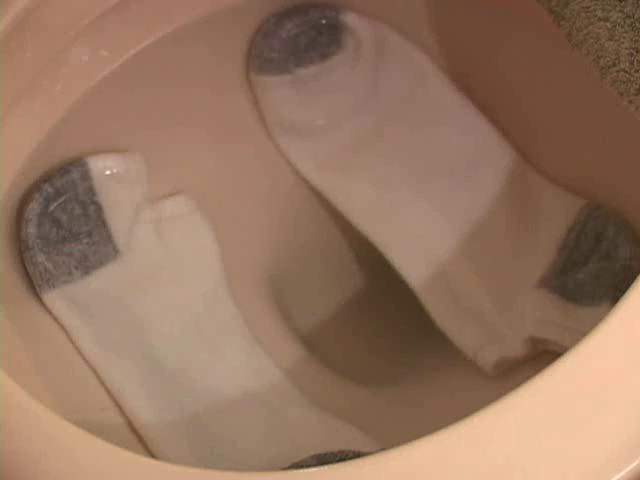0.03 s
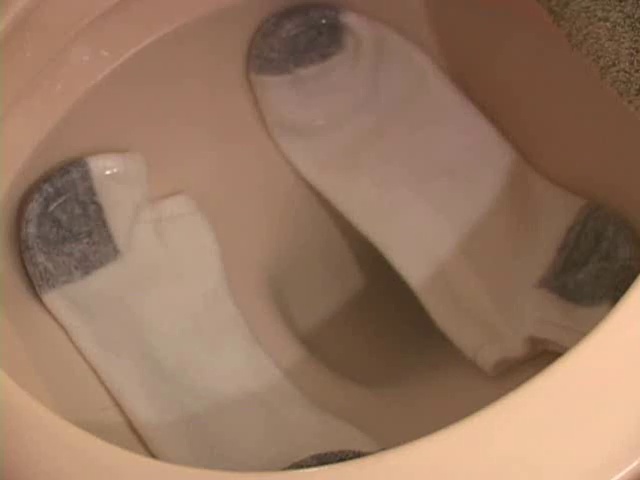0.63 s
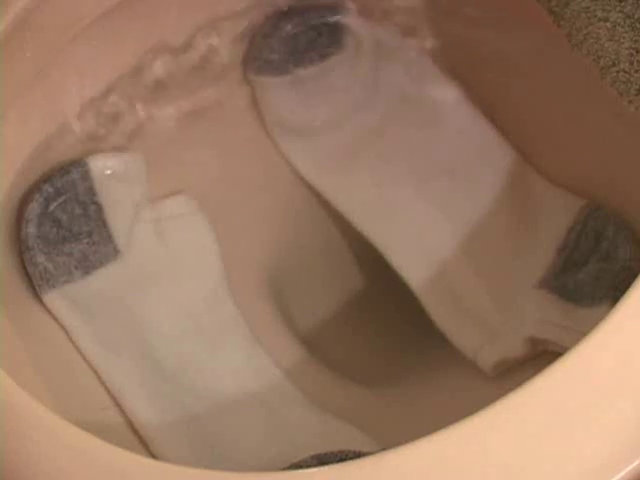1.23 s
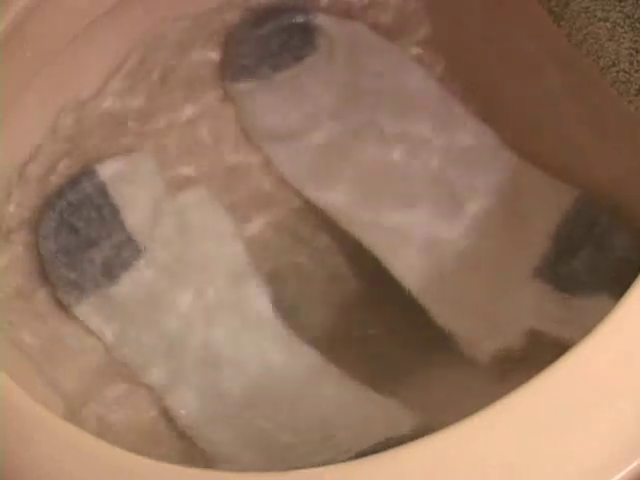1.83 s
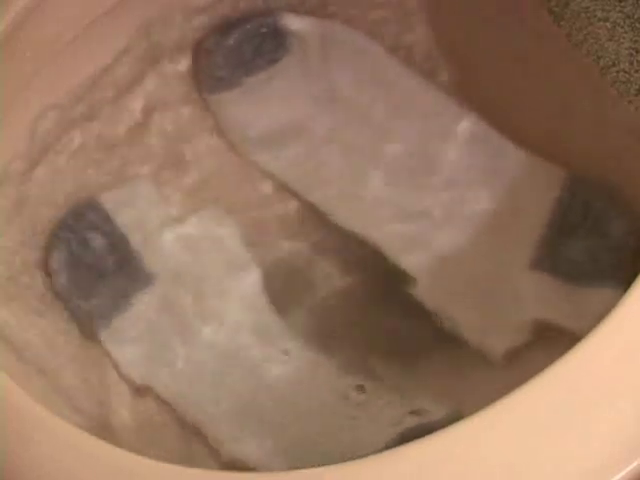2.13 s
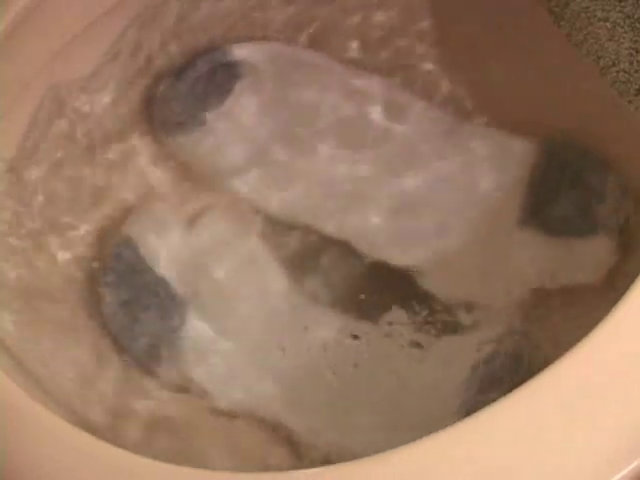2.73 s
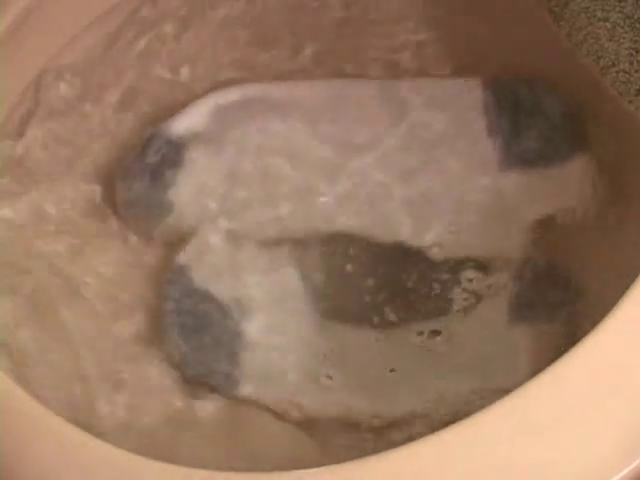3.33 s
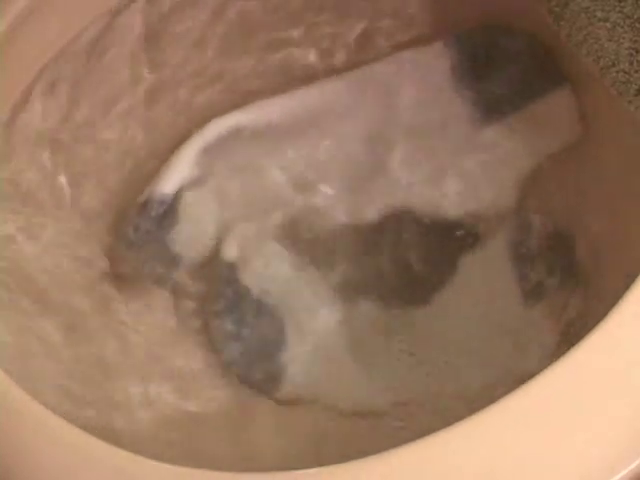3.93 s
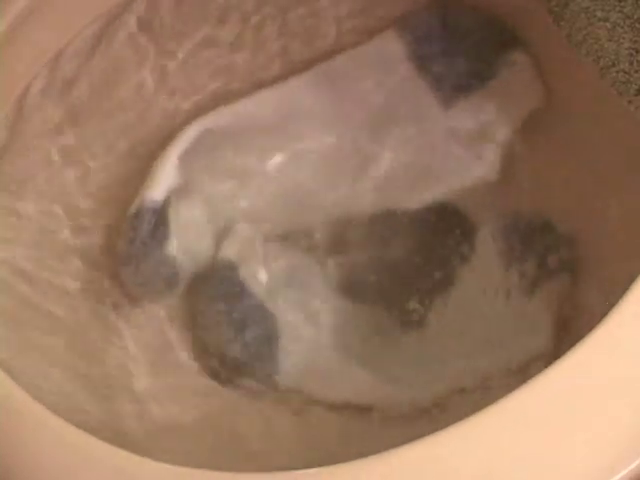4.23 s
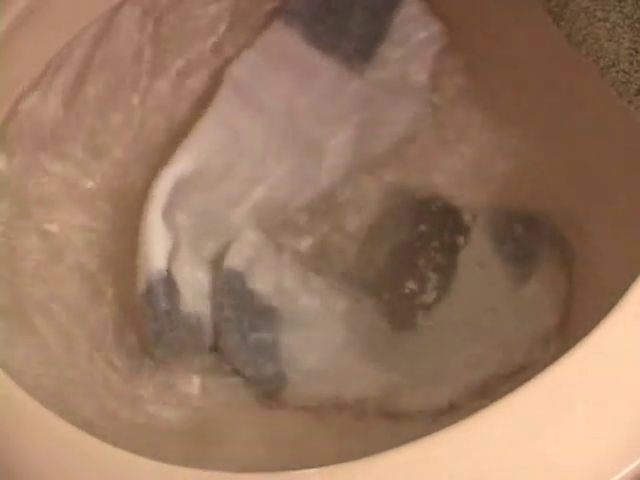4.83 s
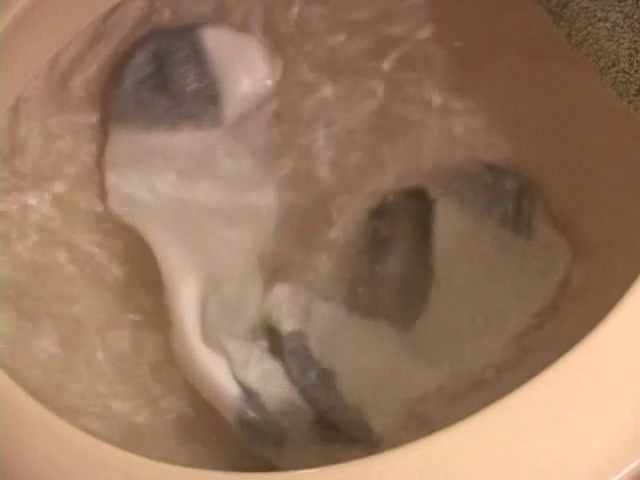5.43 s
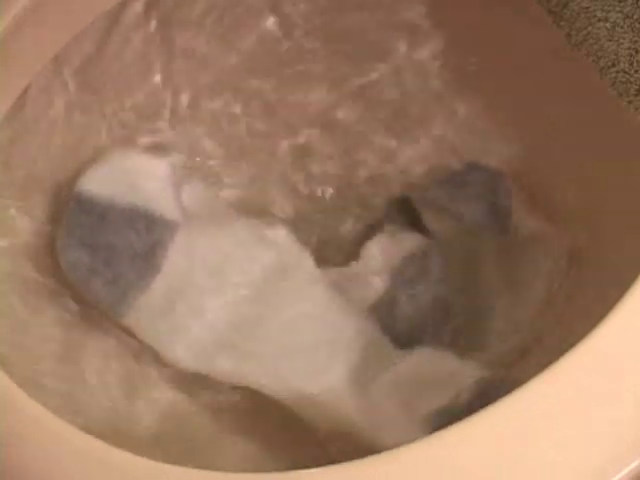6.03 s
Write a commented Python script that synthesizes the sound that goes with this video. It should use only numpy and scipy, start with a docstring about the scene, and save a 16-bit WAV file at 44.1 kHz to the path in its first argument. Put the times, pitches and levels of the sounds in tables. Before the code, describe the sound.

Close up in a small bathroom, a toilet handle knocks softly and water gushes around the bowl, gulping and gurgling down the drain.

```python
"""A small bathroom, just above the toilet bowl: a flush with a pair of socks in it.
The handle knocks on the tank. Water comes in gushes: large bubbles churn, small ones splash,
spray ticks with a low microphone rumble. The drain gulps, then gurgles over a trickle from the rim.
The water rings in the hollow of the bowl, the walls add a short tail; heard on the left channel."""
import sys
import numpy as np
from scipy import signal
from scipy.io import wavfile
from scipy.ndimage import uniform_filter1d

SR = 44100
rng = np.random.default_rng(int(sys.argv[2]) if len(sys.argv) > 2 else 0)


def unload_wav(signal):
    """Save mono or channel-first audio to the path in sys.argv[1] as 16-bit WAV at rate SR, clipped to [-1, 1]."""
    wavfile.write(
        sys.argv[1],
        SR,
        np.round(np.clip(np.atleast_2d(signal).T, -1, 1) * 32767).astype(np.int16),
    )


N = 268569
TIME_S = np.arange(N) / SR

# start_s, rise_s, fall_after_s, t60_s, churn_db, splash_db, spray_db, splash_pitch_hz
WATER_GUSHES = [(.82, .07, .13, 2.5, -58, -55, -63, 1700), (.903, .03, .15, .8, -37, -49, -63, 1700),
                (1.115, .01, 0.027, .2, -45, -49, -57, 1700), (1.2, .03, .05, .18, -47, -49, -74, 1450),
                (1.362, .02, .03, .15, -43.5, -60, -63, 2150),
                (1.41, 0.039, .07, .1, -37.5, -49, -57, 2100),
                (1.462, .025, .18, .15, -24.3, -41, -49, 1950), (1.5, .04, .45, .4, -38, -42, -46, 2800),
                (1.53, .003, 0.019, .12, -21.5, -29, -45, 2100),
                (1.58, .035, .065, .06, -30, -26, -41, 2940), (1.655, .03, .12, .15, -28, -36.5, -50, 2200),
                (1.803, .002, .05, .4, -25.5, -29, -47, 2500), (1.957, .003, .11, .2, -27, -34, -50, 2350),
                (2.06, .025, .16, .1, -24, -35, -48, 2650),
                (2.222, .012, .438, .15, -24.7, -36.5, -48.5, 2600),
                (2.68, .012, .04, .05, -34.5, -30, -50, 2050),
                (2.772, .002, .025, .08, -34, -33, -46.5, 2600),
                (2.812, .003, .018, .05, -32.5, -29.5, -49, 2750),
                (2.883, .002, .017, .04, -29.5, -32.5, -52, 2650),
                (2.915, .002, .016, .05, -28.5, -32, -49.5, 2600),
                (2.951, .003, .085, .07, -26.5, -39, -52.5, 2200),
                (3.058, .002, .12, .1, -27, -41, -51, 2500), (3.16, .03, .17, .1, -29, -32, -49.5, 2050),
                (3.34, .01, .055, .07, -26, -36, -56, 1900), (3.446, .002, .12, .2, -27, -40, -53.5, 3100),
                (3.592, .003, .08, .3, -34, -39, -51, 2900),
                (3.643, .005, .015, .15, -43, -26, -40.5, 3400),
                (3.951, 0.011, 0.019, .1, -36, -38, -43, 2330),
                (4.036, .003, 0.027, .1, -39, -44, -54, 1800), (4.121, .006, .035, .1, -34, -38, -56, 2000),
                (4.174, 0.0025, .012, .07, -36, -44, -60, 2200),
                (4.207, .001, .08, .08, -28.5, -35, -54, 1500),
                (4.3, .002, .04, .15, -29.5, -44, -58.5, 1600),
                (4.364, .002, .035, .2, -31, -47, -61, 1560),
                (4.42, .002, 0.15, 0.24, -26.5, -45, -50.5, 1750),
                (4.625, 0.0081, .028, .12, -34.5, -34, -53, 1720),
                (4.675, .004, .04, .1, -38, -46, -55, 2100), (4.712, .016, .02, .1, -31.5, -32, -49, 3000),
                (4.822, .003, .014, 0.09, -31, -33.5, -53, 1550)]


def gushes():
    """Each gush rises, holds and dies, driving churn, splash and spray; strong splashes set the pitch."""
    power, weighted_hz = np.full((3, N), 1e-14), np.full(N, 2e-11)
    for start_s, rise_s, fall_after_s, t60_s, *levels_db, pitch_hz in WATER_GUSHES:
        age_s = TIME_S - start_s
        attack = np.clip(age_s / rise_s, 0, 1)
        decay = amp(-60 * np.clip((age_s - fall_after_s) / t60_s, 0, 2))
        gush_power = np.outer(amp(levels_db), attack * decay) ** 2
        power += gush_power
        weighted_hz += pitch_hz * gush_power[1]
    splash_hz = weighted_hz / power[1]
    churn_surge_db, splash_surge_db = .3 * surge(span_s=.02), surge(span_s=.02)
    uneven_flow = amp([churn_surge_db, splash_surge_db, splash_surge_db / 2])
    churn_gain, splash_gain, spray_gain = np.sqrt(power) * uneven_flow
    return churn_gain * churn() + splash_gain * splash(splash_hz) + spray_gain * spray()


# freq_hz, gain_db
CHURN_SPECTRUM = [(40, -22), (130, -11), (200, -2.5), (280, 0.5), (400, 0), (600, -3), (760, 2.5),
                  (950, -8), (1200, -3.5), (1600, -18.5), (3000, -52)]


def churn():
    """Large bubbles break off an air pocket at the drain and shake it; being smaller, they ring higher."""
    pocket_hz, pocket_db = air_pocket()
    large = bubbles(1.896 * pocket_hz, spread_oct=1, cycles=1.4, spread_db=1.5,
                    rise=.032, count=6000, samples=600)
    churning = steady(colour(large, CHURN_SPECTRUM), span_s=.0235)
    pocket = resonate(rng.standard_normal(N), pocket_hz, width_hz=77)
    pocket = steady(resonate(pocket, pocket_hz, width_hz=64), span_s=.077)
    return amp(1.5) * churning + amp(4.5 + pocket_db) * pocket


# start_s, length_s, lowest_hz, level_db
POCKET_SWELLS = [(.82, .2, 190, 1), (1.0, .36, 235, -9), (1.32, .2, 175, -1), (1.73, .13, 260, -6),
                 (2.04, .17, 220, -6), (2.2, .14, 225, -10), (2.361, .13, 240, -6), (2.5, .24, 222, -9),
                 (2.76, .12, 212, -7), (2.97, .25, 250, -6), (3.421, .2, 225, -13), (4.27, .31, 190, -8)]


def air_pocket(rest_hz=315, rest_db=-12):
    """Pitch and level of the air in the whirlpool's throat: the note sinks as the pocket swells."""
    pitch_hz, level_db = np.full(N, float(rest_hz)), np.full(N, float(rest_db))
    for start_s, length_s, lowest_hz, swell_db in POCKET_SWELLS:
        arch = abs(np.sin(np.pi * np.clip((TIME_S - start_s) / length_s, 0, 1)))
        pitch_hz *= (lowest_hz / rest_hz) ** arch
        level_db += (swell_db - rest_db) * np.minimum(3 * arch, 1)
    return pitch_hz, level_db


# freq_hz, gain_db
SPLASH_SPECTRUM = [(300, -12.5), (1000, 7), (1500, -3.5), (2300, 3.5), (2640, -3.5), (3000, 1.5),
                   (3800, 0.5), (5500, 4), (8000, -8), (15000, -28)]


def splash(pitch_hz):
    """Small bubbles ring above the churn."""
    small = bubbles(pitch_hz, spread_oct=.788, cycles=5, spread_db=4, rise=.033, count=11000, samples=220)
    return amp(-.5) * steady(colour(small, SPLASH_SPECTRUM), span_s=.018)


# freq_hz, gain_db
SPRAY_AND_MIC_RUMBLE_SPECTRUM = [(25, 14.5), (100, 16.5), (300, 4.5), (1500, -15.5), (5000, 5.5),
                                 (7000, 1.5), (10000, -1.5), (15500, -7)]


def spray():
    """Fine drops tick, with a low microphone rumble that follows them."""
    ticks = droplets(per_s=3300, spread_db=2.5)
    return amp(8) * steady(colour(ticks, SPRAY_AND_MIC_RUMBLE_SPECTRUM), span_s=.047)


# start_s, level_db, pitch_hz, decay_s, relative_spray_db
WATER_SLAPS = [(.95, -34, 480, .027, -19), (.968, -30.5, 740, 0.0082, -27), (1.015, -35, 840, .0042, -26),
               (1.032, -46, 950, .072, -28), (1.037, -45.5, 8200, 0.015, -7), (1.12, -49, 5760, .016, -18),
               (1.132, -37, 720, .006, -22), (1.458, -37, 5800, .004, -13), (1.531, -26, 960, .007, -20),
               (1.69, -34, 6020, .018, -7), (1.777, -24, 1400, .003, -9), (1.96, -26, 1200, .008, -11),
               (2.224, -25.5, 3200, 0.0059, -9), (2.314, -21, 800, .0034, -15.5),
               (2.33, -22.5, 3260, .0035, -20), (2.63, -23, 665, 0.0067, -12),
               (2.67, -29.5, 4930, 0.011, -8), (2.823, -21, 4870, 0.002, -20),
               (2.887, -31, 1260, 0.0047, -8), (2.98, -31.5, 3340, .008, -2), (3.061, -31, 970, .0027, -7),
               (3.157, -28, 4030, .0065, -5.5), (3.447, -27, 880, .004, -20), (3.462, -29, 3500, .005, -18),
               (3.507, -22, 910, 0.0017, -10), (3.697, -29, 3980, 0.0057, -21),
               (3.903, -39, 3850, .0052, -19), (4.023, -34, 2150, .0048, -19),
               (4.122, -27.5, 3730, 0.0047, -7), (4.262, -30, 2200, .011, -15),
               (4.471, -23.5, 670, 0.0044, -15), (4.514, -25, 770, 0.0044, -21), (4.57, -26, 2800, .02, -9),
               (4.824, -30, 880, .011, -14), (4.839, -38.5, 3730, .0066, -11), (5.375, -52, 4550, .0076, 8),
               (5.426, -44.5, 2860, .015, -6), (5.624, -39, 1100, 0.0066, -20),
               (5.765, -40.5, 990, .0074, -19), (5.929, -43, 1260, .016, -8)]


def slaps():
    """Water folds over and traps a cloud of bubbles at once, with a spit of spray."""
    out, t = np.zeros(N), np.arange(SR // 10) / SR
    for start_s, level_db, pitch_hz, decay_s, spray_db in WATER_SLAPS:
        cloud = bubbles(np.full(len(t), pitch_hz), spread_oct=.46, cycles=3.5, spread_db=5,
                        rise=.052, count=300, samples=300)
        spit = amp(spray_db) * rng.standard_normal(len(t))
        burst = (1 - np.exp(-t / .00049)) * np.exp(-(t / decay_s) ** 2 / 2)
        add(out, start_s, amp(level_db) * burst * (steady(cloud, span_s=.0097) + spit))
    return out


# start_s, level_db, start_hz, end_hz, length_s
DRAIN_GULPS = [(1.96, -27.5, 3380, 1820, .11), (2.129, -27.5, 2100, 2830, .065),
               (2.49, -29, 1887, 2600, .076), (2.673, -31.5, 2630, 1840, .056),
               (2.941, -28, 2170, 2620, .04), (2.982, -33, 2560, 1510, .056), (3.188, -31, 2480, 2150, .07),
               (3.315, -36, 3620, 1340, .11), (4.027, -31, 2520, 1520, .06),
               (4.627, -35.5, 1200, 2400, .059)]


def gulps():
    """The drain draws in a swarm of like bubbles; their size drifts, so the pitch slides."""
    out = np.zeros(N)
    for start_s, level_db, start_hz, end_hz, length_s in DRAIN_GULPS:
        pitch_hz = np.geomspace(start_hz, end_hz, int(length_s * SR))
        swarm = bubbles(pitch_hz, spread_oct=.28, cycles=11, spread_db=6, rise=.01, count=120, samples=400)
        swell = signal.windows.tukey(len(pitch_hz), .6)
        add(out, start_s, amp(level_db) * swell * steady(swarm, span_s=.014))
    return amp(-3.5) * out


# start_s, level_db, start_hz, end_hz, length_s
LOUD_BUBBLES = [(.971, -23.5, 740, 827, .012), (1.012, -42, 1083, 1116, .022), (1.198, -44, 950, 1150, .02),
                (1.356, -42.5, 1790, 2960, 0.017), (2.029, -20.5, 2435, 2124, .017),
                (3.187, -19, 2250, 2400, .014), (3.36, -23, 2260, 1990, 0.018),
                (3.729, -21.5, 2040, 3140, 0.0068), (3.911, -31, 478, 705, 0.016),
                (4.054, -26, 2080, 1790, 0.018), (4.093, -28, 1780, 1480, 0.017),
                (4.227, -23, 1220, 1650, 0.012), (4.299, -22.5, 1255, 1580, 0.0092),
                (4.506, -28, 1830, 1630, .0073), (4.796, -22, 2080, 2434, 0.012),
                (4.913, -30, 1960, 2360, .013), (4.924, -30.5, 444, 546, .037),
                (4.954, -32, 660, 974, .016), (5.078, -36, 855, 1080, 0.0143), (5.139, -37, 780, 860, .014),
                (5.153, -32, 2000, 2400, .0083), (5.219, -38.5, 1030, 680, .018),
                (5.278, -29.5, 4540, 4830, 0.0094), (5.427, -39.5, 373.4, 433, 0.12),
                (5.439, -36, 814, 1020, .011), (5.47, -35.5, 1510, 1870, 0.013),
                (5.576, -36.5, 1640, 1880, .011), (5.614, -35, 2070, 1910, 0.018),
                (5.72, -35.5, 820, 746, .022), (5.779, -43, 728, 807, .047), (5.909, -38, 972, 1210, .015),
                (5.994, -38.5, 3400, 3500, .0075)]


def single_bubbles():
    """Low glugs to high pings: each bubble glides as its neck changes and wavers as its wall wobbles."""
    out, t = np.zeros(N), np.arange(SR // 3) / SR
    events = list(LOUD_BUBBLES) + gurgle(count=11) + drips(count=10)
    for start_s, level_db, start_hz, end_hz, length_s in events:
        age = t / length_s
        wobble = unit_rms(uniform_filter1d(rng.standard_normal(len(t)), size=60))
        flutter = unit_rms(uniform_filter1d(rng.standard_normal(len(t)), size=60))
        pitch_hz = start_hz * (end_hz / start_hz) ** np.minimum(age, 1) * (1 + .071 * wobble)
        swell = (1 - np.exp(-age / .18)) * np.exp(-age ** 3) * (1 + .35 * flutter)
        add(out, start_s, amp(level_db) * swell * np.sin(2 * np.pi * np.cumsum(pitch_hz) / SR))
    return amp(-1.5) * out


def gurgle(count, from_s=4.97, centre_hz=950, spread_oct=1.2, rise_oct=.13, cycles=13):
    """Loosely spaced bubbles as the drain empties: larger ones are lower and longer; most glide up."""
    jitter, pitch, glide, strength = rng.uniform(-1, 1, (count, 4)).T
    start_s = from_s + (N / SR - from_s) * (np.arange(count) + .5 + jitter / 2) / count
    level_db = -43.5 + 2.5 * strength
    start_hz = centre_hz * 2 ** (spread_oct * pitch)
    end_hz = start_hz * 2 ** (rise_oct * (1 + 2 * glide))
    return list(zip(start_s, level_db, start_hz, end_hz, cycles / start_hz))


def drips(count, from_s=4.87, centre_hz=4900, spread_oct=.45, rise_oct=.13, cycles=18):
    """Stray drops from the rim each trap one tiny bubble that pings upward."""
    when, pitch, strength = rng.uniform(-1, 1, (count, 3)).T
    start_s = from_s + (N / SR - from_s) * (1 + when) / 2
    level_db = -46 + 4 * strength
    start_hz = centre_hz * 2 ** (spread_oct * pitch)
    return list(zip(start_s, level_db, start_hz, start_hz * 2 ** rise_oct, cycles / start_hz))


# time_s, level_db
RIM_FLOW = [(.8, -97), (1.0, -63), (1.3, -67), (1.6, -48.5), (3.7, -42), (3.85, -45.5), (4.8, -42.5),
            (5.05, -45.5), (5.25, -47), (5.45, -47.5), (5.7, -46), (5.86, -48.5), (6.09, -47)]
# freq_hz, gain_db
RIM_SPECTRUM = [(30, 7.5), (140, 4), (280, -3), (450, 2.5), (750, -6), (1100, -9.5), (2100, -5), (2900, -8),
                (5000, -1), (7000, -8), (10000, -6.5), (15500, -13.5)]


def trickle():
    """A thin sheet of water from the rim: small bubbles, ringing drops and a soft patter."""
    tinkle = bubbles(np.full(N, 1800.), spread_oct=1.25, cycles=6, spread_db=3.5,
                     rise=.015, count=7000, samples=500)
    drops = bubbles(np.full(N, 4600.), spread_oct=.5, cycles=8, spread_db=4,
                    rise=.01, count=700, samples=400)
    patter = droplets(per_s=5200, spread_db=4) + amp(-7) * droplets(per_s=51, spread_db=3.5)
    water = unit_rms(colour(tinkle + amp(-7) * drops + amp(-1) * patter, RIM_SPECTRUM))
    return amp(np.interp(TIME_S, *np.transpose(RIM_FLOW))) * water


# start_s, level_db, centre_hz
HANDLE_KNOCKS = [(0.13, -52.5, 179), (.215, -53.5, 110), (.383, -49, 272), (0.594, -47.5, 398),
                 (0.736, -48.5, 338), (0.831, -42, 1110), (0.866, -41.5, 1300)]
# freq_hz, level_db, t60_s
TANK_MODES = [(104.6, 2, 0.36), (168, 4.5, 0.093), (245, -3, 0.38), (345, -6, 0.48), (666, -0.5, 0.22),
              (1100, 6, 0.14), (1360, -21, 0.047), (1430, -18, 0.1), (1700, -6, 0.41), (2490, -13, 0.062),
              (3300, -6, 0.069)]


def handle(rolloff_db_per_oct=9.6, attack_s=.0019):
    """Handle and linkage knock on the tank, ringing the modes near each blow's centre frequency."""
    out, t = np.zeros(N), np.arange(SR // 2) / SR
    for start_s, level_db, centre_hz in HANDLE_KNOCKS:
        ring = np.zeros(len(t))
        for freq_hz, mode_db, t60_s in TANK_MODES:
            struck_db = mode_db - rolloff_db_per_oct * abs(np.log2(freq_hz / centre_hz))
            ring += amp(struck_db - 60 * t / t60_s) * np.sin(2 * np.pi * freq_hz * t)
        add(out, start_s, amp(level_db) * ring * (1 - np.exp(-t / attack_s)))
    return out


# freq_hz, width_hz, gain_db
BOWL_AIR_MODES = [(356, 14, -11), (489, 29.6, -8.5), (729, 62, 2), (1116, 24, 14), (1438, 24, 12),
                  (1765, 36, 5), (2050, 29.6, 7), (2417, 39, 10), (2860, 56, 4), (3216, 79, 6.5),
                  (3630, 77, 6.5), (4230, 31, 2)]


def bowl(x):
    """Direct sound plus the ringing of the hollow above the water."""
    t = np.arange(SR // 6) / SR
    ring = np.zeros(len(t))
    for freq_hz, width_hz, gain_db in BOWL_AIR_MODES:
        decay = 2 * np.pi * width_hz / SR * np.exp(-np.pi * width_hz * t)
        ring += amp(gain_db) * decay * np.cos(2 * np.pi * freq_hz * t)
    return x + signal.oaconvolve(x, ring)[:N]


def bathroom(x, t60_s=.33, predelay_s=.006, wet_db=-15):
    """Direct sound plus a short tail from the walls."""
    t = np.arange(SR // 2) / SR
    reflections = rng.standard_normal(len(t)) * amp(-60 * t / t60_s) * (t > predelay_s)
    tail = colour(reflections, [(100, -4), (400, 0), (3000, -9.5), (14000, 8)])
    return x + amp(wet_db) * signal.oaconvolve(x, tail / np.linalg.norm(tail))[:N]


# freq_hz, gain_db
ROOM_AIR_SPECTRUM = [(30, -20), (60, 0), (105, -20), (160, -5), (250, -16), (400, -12.5), (1000, -24),
                     (3000, -49)]


def rumble():
    """Low murmur of air in the room."""
    return amp(-71) * unit_rms(colour(rng.standard_normal(N), ROOM_AIR_SPECTRUM))


# freq_hz, gain_db
HISS_SPECTRUM = [(30, 6), (150, 8.5), (500, 1.5), (1500, 4.8), (6000, 2.8), (15500, 1)]


def hiss():
    """Steady preamplifier noise."""
    return amp(-64.5) * unit_rms(colour(rng.standard_normal(N), HISS_SPECTRUM))


def bubbles(centre_hz, spread_oct, cycles, spread_db, rise, count, samples):
    """Random bubbles around a pitch curve; each rings a few cycles and rises in pitch as it surfaces."""
    length = len(centre_hz)
    when, pitch, phase, strength = rng.random((count, 4)).T
    onset = (when * length).astype(int)
    pitch_hz = centre_hz[onset] * 2 ** (spread_oct * np.arctanh(.97 * (2 * pitch - 1)))
    turns = pitch_hz[:, None] * np.arange(samples) / SR
    age = turns / cycles
    tone = np.sin(2 * np.pi * (turns * (1 + rise * np.minimum(age, 4)) + phase[:, None]))
    envelope = (1 - np.exp(-2 * turns)) * np.exp(-age) * np.linspace(1, 0, samples)
    gain = amp(spread_db * np.minimum(-np.log(strength), 3.5))
    rings = gain[:, None] * envelope * tone
    positions = onset[:, None] + np.arange(samples)
    return unit_rms(np.bincount(positions.ravel(), rings.ravel(), length + samples)[:length])


def droplets(per_s, spread_db):
    """Each landing drop is a puff of noise about a millisecond long; a few are large."""
    landings = rng.random(N) < per_s / SR
    sizes = landings * amp(spread_db * np.minimum(rng.exponential(1, N), 5))
    envelope = np.sqrt(np.convolve(sizes ** 2, np.hanning(SR // 600), "same"))
    return unit_rms(envelope * rng.standard_normal(N))


def surge(span_s):
    """Smooth random swell, rms 1."""
    span = int(span_s * SR)
    return unit_rms(uniform_filter1d(uniform_filter1d(rng.standard_normal(N), span), span))


def resonate(x, pitch_hz, width_hz):
    """Unity-gain resonance following a pitch curve."""
    carrier = np.exp(2j * np.pi * np.cumsum(pitch_hz) / SR)
    pole = np.exp(-np.pi * width_hz / SR)
    return 2 * (carrier * signal.lfilter([1 - pole], [1, -pole], x / carrier + 1e-18)).real


def colour(x, spectrum, taps=4096):
    """Minimum-phase filter through (freq_hz, gain_db) points."""
    freq_hz, gain_db = np.transpose(spectrum)
    bin_hz = abs(np.fft.fftfreq(taps, 1 / SR)) + 1
    log_gain = np.log(amp(np.interp(np.log(bin_hz), np.log(freq_hz), gain_db)))
    impulse = np.fft.ifft(np.exp(np.conj(signal.hilbert(log_gain)))).real
    return signal.oaconvolve(x, impulse)[:len(x)]


def steady(x, span_s):
    """Levels a texture's slow swells, keeps its grain."""
    local_power = abs(uniform_filter1d(x ** 2, int(span_s * SR)))
    return x / np.sqrt(local_power + np.mean(x ** 2) / 100)


def unit_rms(x):
    """Scales to rms 1."""
    return x / np.sqrt(np.mean(x ** 2) + 1e-20)


def amp(db):
    """Decibels to gain."""
    return 10 ** (np.asarray(db) / 20)


def add(mix, start_s, sound):
    """Mixes a sound in at start_s."""
    part = mix[round(start_s * SR):][:len(sound)]
    part += sound[:len(part)]


def scene():
    """Water, handle and room on the left channel; a faint leak on the right."""
    water = gushes() + slaps() + gulps() + single_bubbles() + trickle()
    left = bathroom(bowl(water) + handle()) + rumble()
    return np.array([left, amp(-57) * left])


def record(dry, silent_until_s=.127, cutoff_hz=15650):
    """Hiss on both channels, a silent start and a low-pass."""
    live = (dry + np.array([hiss() for _ in dry])) * (TIME_S > silent_until_s)
    lowpass = signal.firwin(511, cutoff_hz, window=("kaiser", 9), fs=SR)
    return signal.oaconvolve(live, lowpass[None], "same")


dry = scene()
out = record(dry)
unload_wav(out)
```